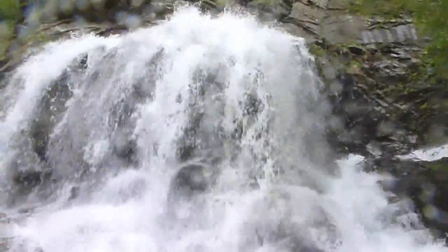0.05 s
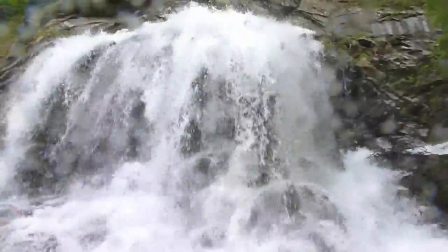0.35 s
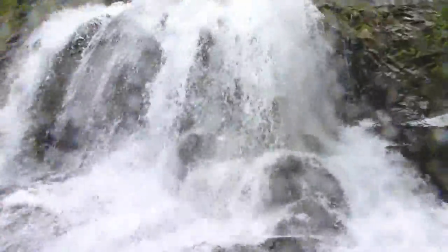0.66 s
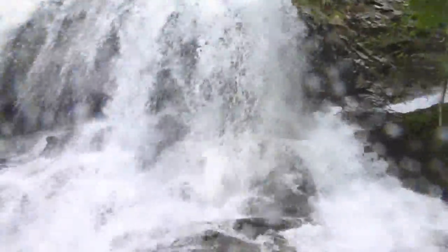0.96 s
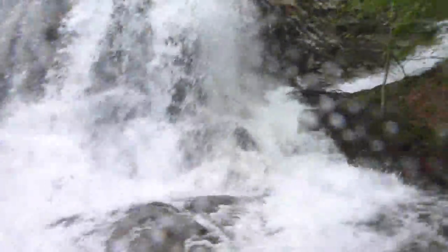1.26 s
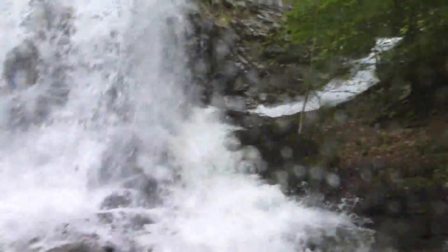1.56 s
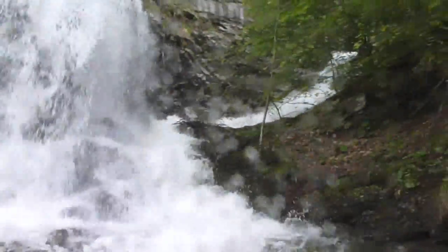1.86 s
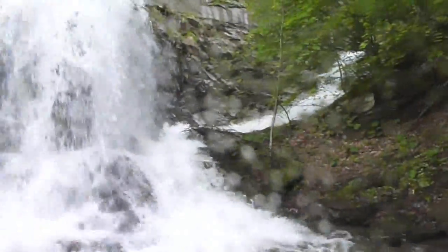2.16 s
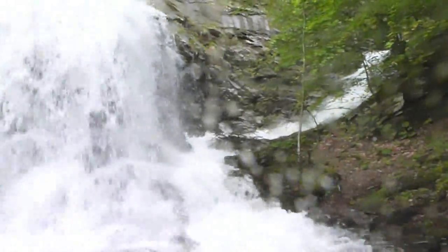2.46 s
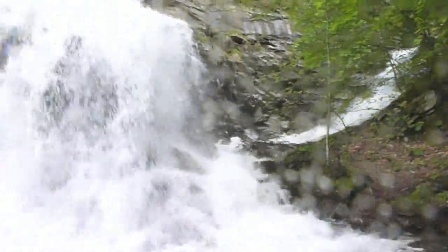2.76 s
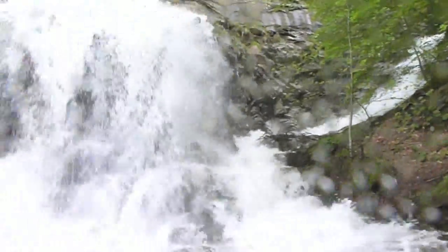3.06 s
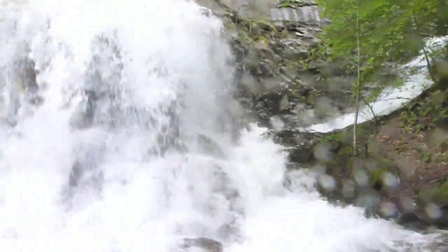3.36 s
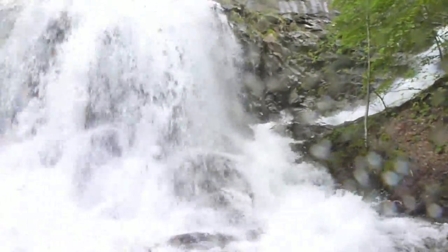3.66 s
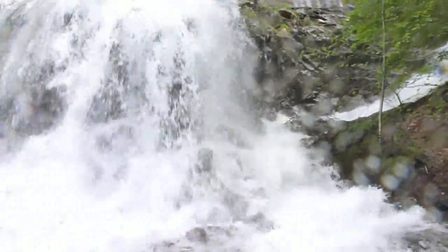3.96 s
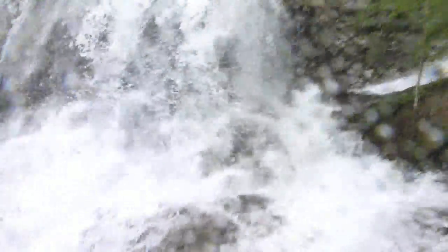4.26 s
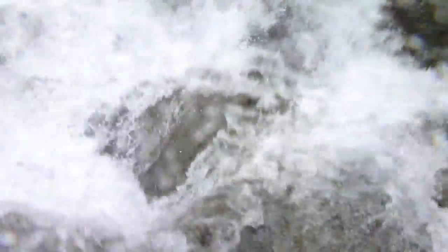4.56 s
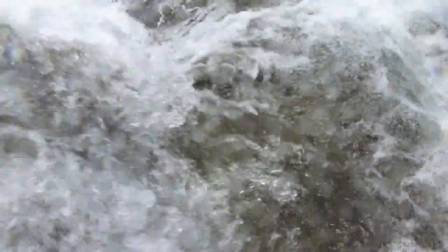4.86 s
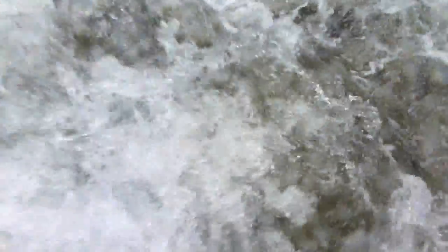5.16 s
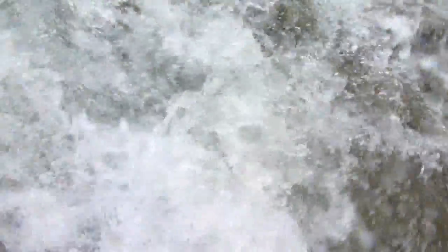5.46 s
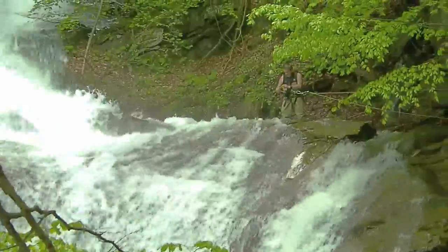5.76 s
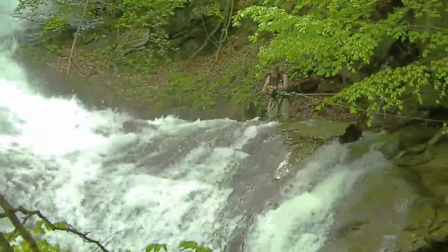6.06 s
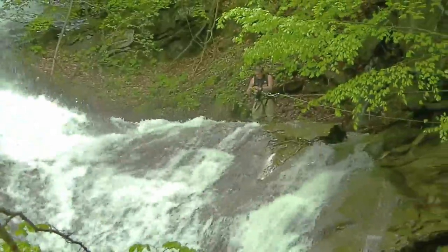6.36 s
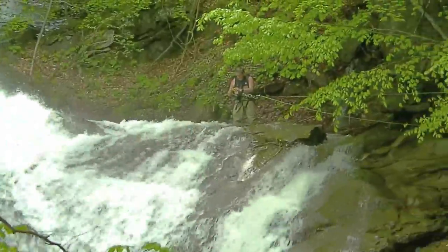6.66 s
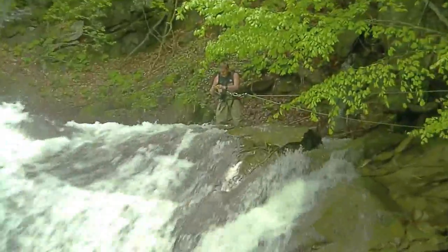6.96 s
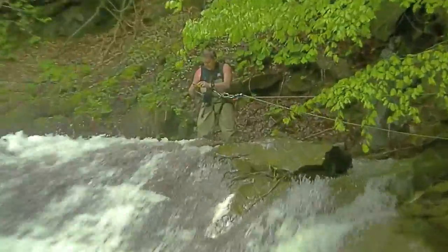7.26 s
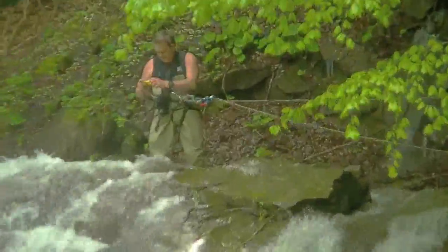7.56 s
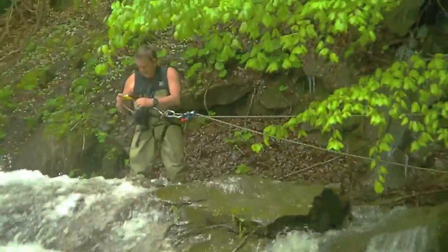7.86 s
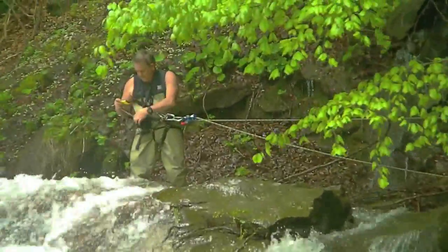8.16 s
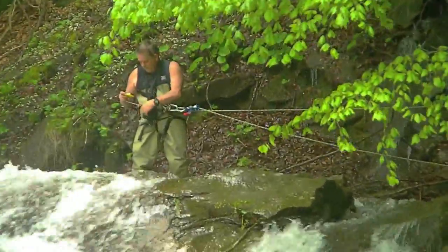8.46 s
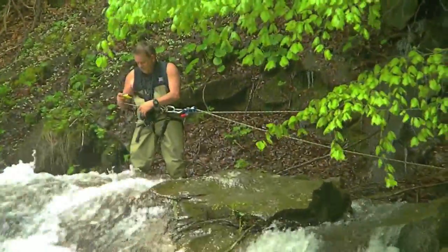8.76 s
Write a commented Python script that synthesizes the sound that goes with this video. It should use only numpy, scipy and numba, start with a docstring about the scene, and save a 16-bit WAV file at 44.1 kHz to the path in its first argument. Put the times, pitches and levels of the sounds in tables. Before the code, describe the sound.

At the foot of a forest waterfall, water pounds into a pool with a dull, continuous mono roar. The fall's draught buffets the microphone with low rumbles and thumps, and the roar ducks under the stronger ones. A little past halfway the sound fades out quickly and a second spot fades in: a bright, steady hiss of water spraying down a rock chute, mostly in the right ear.

```python
"""A dull mono roar at the foot of a waterfall; the fall's draught buffets the microphone and pushes
the camera's gain down. After a quick fade, a second spot beside the chute: a bright, steady hiss of
spray over rock, mostly in the right ear. The water is countless impacts fused to noise, with ringing
bubbles in it; the gusts are slow pushes of air carrying turbulence and eddies."""
import sys
import numpy as np
from scipy import signal
from scipy.fft import rfft, irfft
from scipy.io import wavfile
from numba import njit

SR = 44100
rng = np.random.default_rng(int(sys.argv[2]) if len(sys.argv) > 2 else 0)


def master(y):
    """Save y as 16-bit WAV."""
    cut = np.clip(np.atleast_2d(y).T, -1, 1)
    pcm = np.round(cut * 32767)  # scale
    wavfile.write(sys.argv[1], SR, pcm.astype(np.int16))


N = 388080
TIME_S = np.arange(N) / SR
FREQ_HZ = np.maximum(np.arange(N // 2 + 1) * SR / N, 1)

# Draught gusts, before gain control: crest_s, rise_s, level_db, edge_hz
GUSTS = [(0.479, 0.044, -24.5, 258), (.94, 0.048, -23, 340), (1.08, 0.06, -23, 219),
         (2.545, 0.033, -21.5, 270), (2.686, 0.025, -16, 250), (3.36, 0.023, -17, 270),
         (3.526, 0.026, -16.5, 230), (3.591, 0.026, -15.5, 570), (3.624, 0.024, -13.5, 250),
         (3.68, .03, -18.5, 282), (3.755, 0.026, -20.5, 240), (4.134, 0.015, -20.5, 500),
         (4.401, .025, -22.5, 300), (4.902, 0.015, -14.5, 393), (4.96, 0.024, -19, 270),
         (5.039, .022, -16.5, 524), (5.367, 0.02, -22, 500)]
# Plunge pool roar, before swell and gain control: freq_hz, density_db
ROAR_SPECTRUM = [(25, -70), (60, -60), (170, -54.5), (350, -55), (500, -57), (900, -58.5), (2100, -64),
                 (3300, -64.5), (5000, -69), (6200, -75), (6900, -83.5), (7250, -97)]
# Slow swell and sag of the roar: time_s, gain_db
ROAR_SWELL = [(0, 2.8), (.35, 2), (.55, -1), (.78, 4.5), (1.13, 0.4), (1.3, 2.5), (1.5, 1), (2.28, 4.5),
              (2.4, 1.5), (2.7, -1), (3.0, 1.5), (3.5, 0), (4.3, -0.5), (4.8, 1.7), (5.3, -1.6)]
# Chute hiss, right microphone: freq_hz, density_db
CHUTE_RIGHT_SPECTRUM = [(45, -100), (110, -79.5), (220, -69), (450, -67), (650, -59), (950, -58.5),
                        (1220, -62), (2500, -57.5), (7000, -57), (10000, -54.4), (12000, -56.5),
                        (15000, -62), (18000, -80)]
# Chute hiss, left microphone: freq_hz, density_db
CHUTE_LEFT_SPECTRUM = [(100, -115), (450, -92), (700, -83.5), (1250, -82.5), (2700, -71.5), (5000, -68.5),
                       (7300, -63.5), (9400, -62), (11500, -64), (15000, -75)]
# Likeness of the two microphones at the chute: freq_hz, coherence
CHUTE_COHERENCE = [(100, .15), (400, .6), (800, .82), (2200, 0.63), (4500, 0.33), (10000, 0.39),
                   (15000, .1)]


def undb(db):
    """Decibels to gain."""
    return 10 ** (np.asarray(db) / 20)


def unit(x):
    """Scale to rms 1."""
    return x / np.std(x)


def over_freq(points):
    """Interpolate (freq_hz, value) points on a log-frequency axis."""
    hz, value = np.transpose(points)
    return np.interp(np.log(FREQ_HZ), np.log(hz), value)


def colour(white, spectrum):
    """Shape white sound of rms 1 to a power density per Hz, given in dB."""
    return irfft(rfft(white) * undb(over_freq(spectrum)) * np.sqrt(SR / 2), N)


def butter(x, hz, kind, order):
    """Butterworth low-pass or high-pass."""
    return signal.sosfilt(signal.butter(order, hz, kind, fs=SR, output="sos"), x)


def cut_top(x, hz):
    """Steep low-pass."""
    return signal.sosfilt(signal.ellip(12, .1, 80, hz, fs=SR, output="sos"), x)


def drift(rate_hz):
    """Smooth random curve, rms 1."""
    return unit(irfft(rfft(rng.standard_normal(N)) / (1 + (FREQ_HZ / rate_hz) ** 4), N))


def turbulence(edge_hz, lowest_hz=48):
    """Hollow rumble of air breaking over the microphone, rms 1."""
    rumble = butter(rng.standard_normal(N), edge_hz, "low", order=4)
    return unit(butter(rumble, lowest_hz, "high", order=1))


def draught(push=0.75, eddy_db=6.5, rumble_db=-1.0, full_eddy_rise_s=0.021):
    """Light air wavers; each gust is a slow push with turbulence, and abrupt ones thump at the crest."""
    air = undb(-39.5 + 4.5 * drift(rate_hz=8)) * (push + turbulence(edge_hz=270))
    for crest_s, rise_s, level_db, edge_hz in GUSTS:
        age_s = TIME_S - crest_s
        width_s = np.where(age_s < 0, rise_s, 1.46 * rise_s)  # falls slower than it rises
        swell = np.exp(-(age_s / width_s) ** 2)
        eddy_hz = 0.49 * edge_hz
        angle = 2 * np.pi * eddy_hz * age_s
        eddy = -undb(eddy_db) * full_eddy_rise_s / rise_s * angle * np.exp((1 - angle ** 2) / 2)
        pressure = push + undb(rumble_db) * turbulence(edge_hz)
        air += undb(level_db) * (swell * pressure + eddy)
    return air


@njit
def envelope(x, attack_s, release_s):
    """Level follower with separate rise and fall times."""
    out = np.empty(len(x))
    level = np.abs(x[:2000]).mean()
    for i in range(len(x)):
        tau_s = attack_s if abs(x[i]) > level else release_s
        level += (abs(x[i]) - level) / (SR * tau_s)
        out[i] = level
    return out


def gain_control(x, knee_db=-16.5, attack_s=0.0066, release_s=0.095):
    """The camera turns itself down as the pressure passes a soft knee."""
    return x / np.sqrt(1 + (envelope(x, attack_s, release_s) / undb(knee_db)) ** 2)


def bubbles(ring_cycles=35, glide=.06, spread_db=2.0, count=9000):
    """Air pockets of all sizes ring briefly and rise in pitch; a few are much stronger than the rest."""
    age_s = np.arange(800) / SR
    onset, smallness, rarity = rng.random((count, 3)).T[:, :, None]
    pitch_hz = 500 * 24 ** smallness
    cycles = pitch_hz * age_s
    life = cycles / ring_cycles  # 1 at 60 dB down
    rings = np.sin(2 * np.pi * cycles * (1 + glide * life)) * np.exp(-np.log(1000) * life)
    strength = undb(-spread_db * np.log(np.maximum(rarity, .02)))
    rings *= pitch_hz * strength  # high bubbles die sooner, so start stronger: equal energy per Hz
    samples = (onset * N).astype(int) + np.arange(len(age_s))
    return unit(np.bincount(samples.ravel(), rings.ravel(), N)[:N])


def white_water(slab_db, flicker_db, bubble_db, churn_hz):
    """Impacts fuse to a hiss with bubbles in it; slabs of water lift all bands, each also flickers."""
    spectrum = rfft(unit(rng.standard_normal(N) + undb(bubble_db) * bubbles()))
    octave = np.clip(np.log2(FREQ_HZ / 100), 0, 7)
    lift_db = slab_db * drift(churn_hz)
    water = 0
    for band in range(8):
        share = np.maximum(1 - abs(octave - band), 0)
        water += irfft(spectrum * share, N) * undb(lift_db + flicker_db * drift(rate_hz=16))
    return unit(water)


def chute(notch_hz=7870, notch_width_hz=150, lag_s=3.7e-5):
    """A wide sheet of spray, partly alike at both microphones, with one narrow gap in its treble."""
    right = white_water(slab_db=0.57, flicker_db=0.53, bubble_db=-11, churn_hz=17)
    independent = white_water(slab_db=0.3, flicker_db=0.8, bubble_db=-10, churn_hz=16)
    coherence = np.clip(over_freq(CHUTE_COHERENCE), 0, 1)
    # left microphone: quarter-cycle lead in the bass, slightly later arrival
    phase_shift = 1j * np.exp(-2j * np.pi * FREQ_HZ * lag_s)
    shared = coherence * phase_shift * rfft(right)
    left = irfft(shared + np.sqrt(1 - coherence ** 2) * rfft(independent), N)
    pair = np.array([colour(left, CHUTE_LEFT_SPECTRUM), colour(right, CHUTE_RIGHT_SPECTRUM)])
    return signal.lfilter(*signal.iirnotch(notch_hz, notch_hz / notch_width_hz, SR), pair)


def foot_of_fall():
    """Plunge pool and draught share one microphone, so the roar ducks under the gusts."""
    water = white_water(slab_db=0.53, flicker_db=0.62, bubble_db=-12, churn_hz=14)
    swell_db = np.interp(TIME_S, *np.transpose(ROAR_SWELL))
    roar = colour(water, ROAR_SPECTRUM) * undb(swell_db)
    ducked = gain_control(roar + draught())
    audible = butter(ducked, 40, "high", order=4)  # the air's slow push is too low for the amplifier
    return cut_top(audible, hz=7300)


def scene(fade_start_s=5.489, silence_s=5.593, fade_end_s=5.68, fade_power=1.13):
    """The roar fades out, then the chute fades in."""
    fade_out = np.interp(TIME_S, [fade_start_s, silence_s], [1, 0]) ** fade_power
    fade_in = np.interp(TIME_S, [silence_s, fade_end_s], [0, 1]) ** fade_power
    return foot_of_fall() * fade_out + chute() * fade_in


def record(dry, ceiling_db=-6.0):
    """The recorder rounds the rare highest peaks and cuts the top."""
    rounded = dry / (1 + (dry / undb(ceiling_db)) ** 8) ** (1 / 8)
    return cut_top(rounded, hz=15350)


dry = scene()
out = record(dry)
master(out)
```